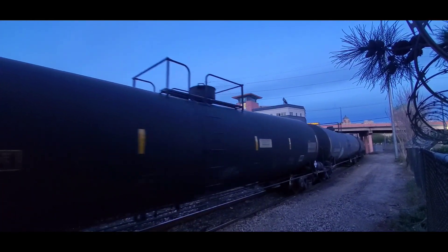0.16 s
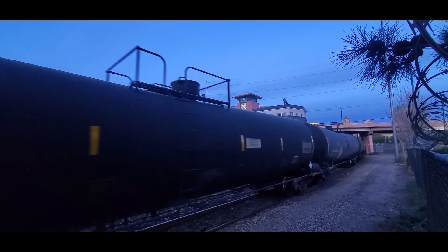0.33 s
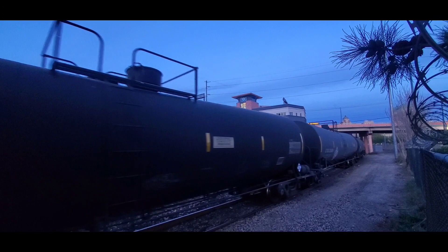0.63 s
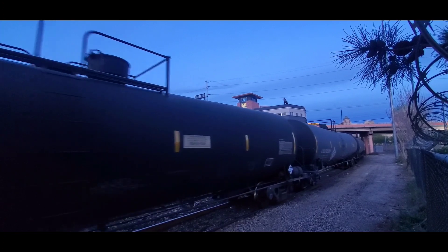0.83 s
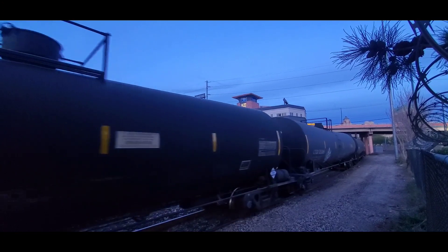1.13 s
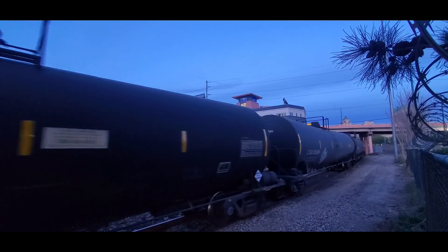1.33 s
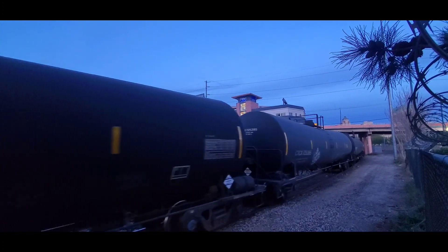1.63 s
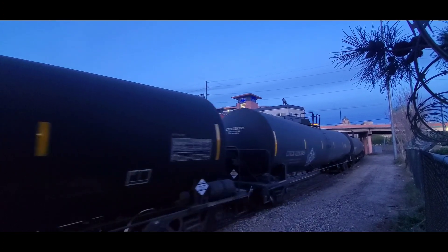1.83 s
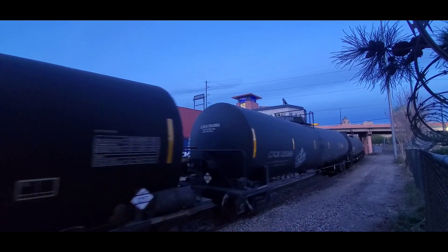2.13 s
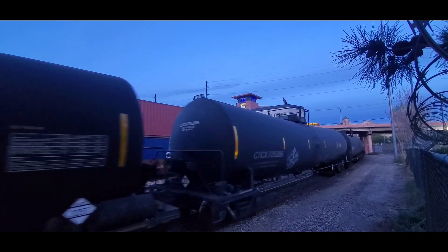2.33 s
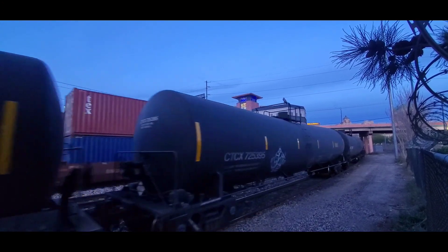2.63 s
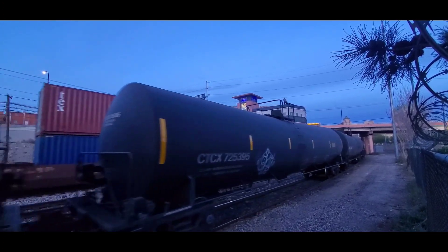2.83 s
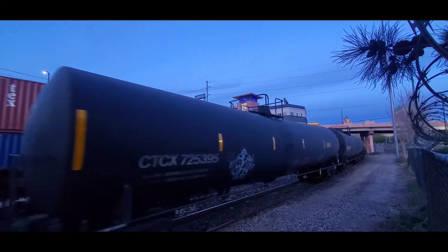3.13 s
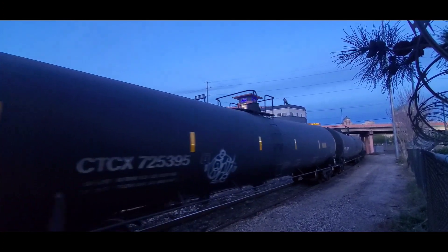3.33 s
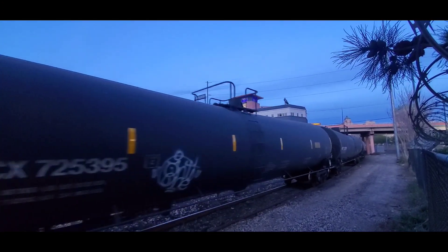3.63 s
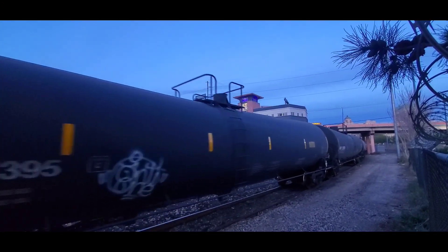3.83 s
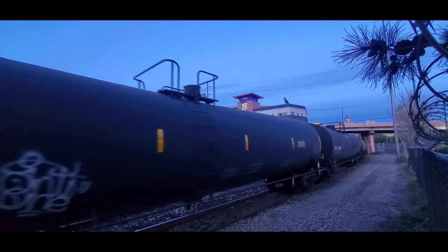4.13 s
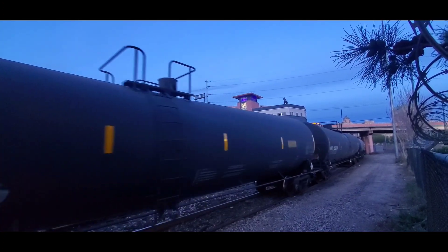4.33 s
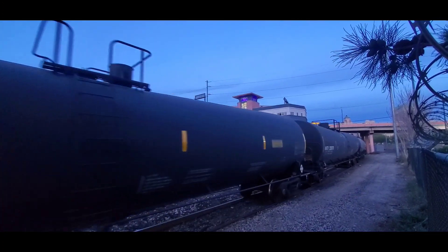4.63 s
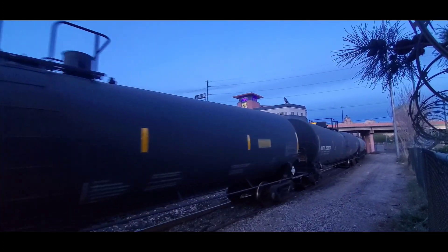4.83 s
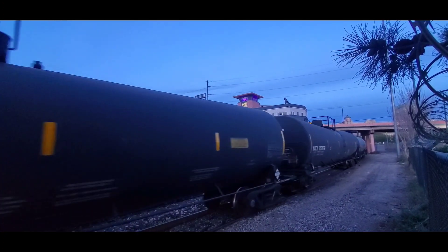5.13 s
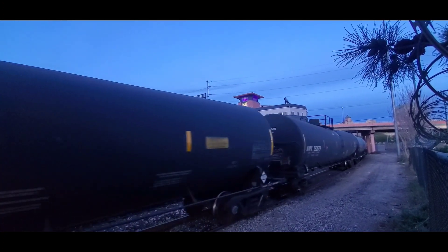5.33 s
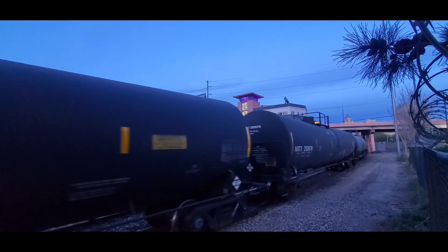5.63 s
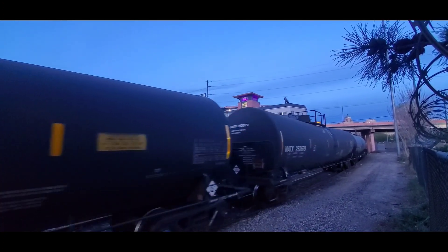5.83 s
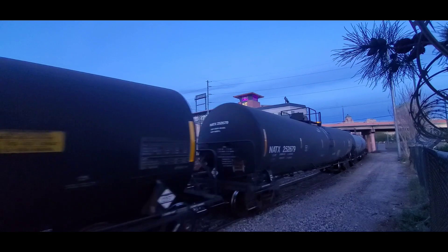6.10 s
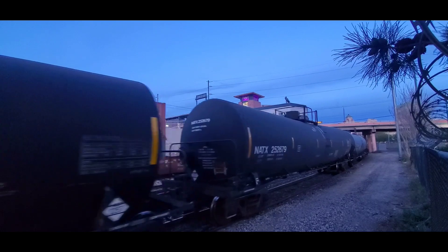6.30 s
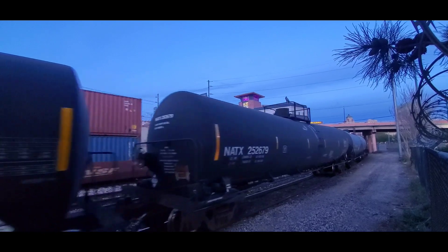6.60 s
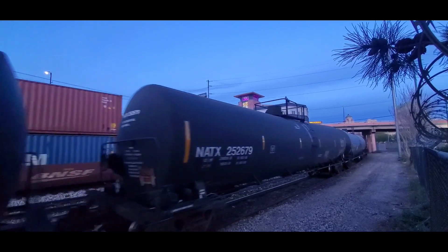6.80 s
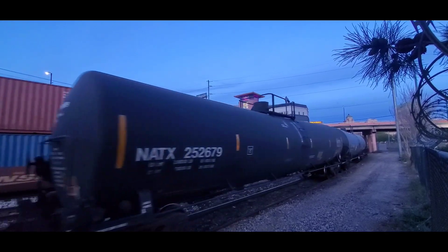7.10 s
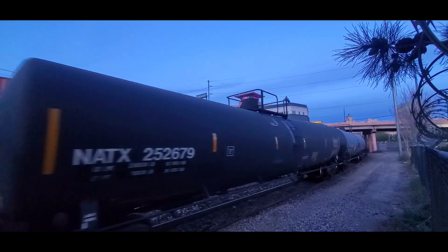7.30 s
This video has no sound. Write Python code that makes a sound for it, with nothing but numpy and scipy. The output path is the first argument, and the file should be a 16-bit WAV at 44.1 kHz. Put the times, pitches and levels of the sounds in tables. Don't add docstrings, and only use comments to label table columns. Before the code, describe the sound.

Heavy tank cars pass beside the track at walking pace: deep rumble, scraping flanges, thin ringing wheels, piercing squeals and dull thumps.

```python
import sys
import numpy as np
from scipy import signal
from scipy.io import wavfile
from scipy.ndimage import uniform_filter1d

SR = 44100
rng = np.random.default_rng(int(sys.argv[2]) if len(sys.argv) > 2 else 0)


def bounce(signal):
    frames = np.transpose(np.atleast_2d(signal))
    limited = np.clip(frames, -1, 1)
    pcm = np.round(limited * 32767).astype(np.int16)
    wavfile.write(sys.argv[1], SR, pcm)


def field_ratio(decibels):
    return 10 ** (np.asarray(decibels, dtype=float) / 20)


N = 328841

SPEED_M_S, DISTANCE_M, SOUND_M_S = 4.5, 6.5, 343


def evened(x):
    return x / np.sqrt(np.mean(x ** 2) + 1e-20)


def read(points, hz):
    f, value = np.transpose(points)
    return np.interp(np.log(hz + 1), np.log(f + 1), value)


def spectrum_grid(size):
    hop = size // 4
    hz = np.fft.rfftfreq(size, 1 / SR)[:, None]
    return hz, np.arange(N // hop + 5) * hop / SR


def patches(size, bins, frames):
    hz, t = spectrum_grid(size)
    field = rng.standard_normal((len(t), len(hz))).T
    across_pitch = uniform_filter1d(field, bins, 0)
    return evened(uniform_filter1d(across_pitch, frames, 1))


def flicker(per_s):
    knots = rng.standard_normal(1000)
    return evened(np.interp(np.arange(N) / SR * per_s, np.arange(1000), knots))


def heard(power, size):
    # pitch_hz, likeness (0-1)
    likeness = [(60, 1.0), (200, .98), (500, .9), (800, .72), (1600, .55), (2500, .3), (3500, .25),
                (6000, .1), (12000, .05)]
    # pitch_hz, left_minus_right_db
    balance = [(60, -1), (92, 0.5), (140, -2.5), (210, 0.5), (330, 1.0), (500, 1.5), (770, 1.0),
               (1170, 1.5), (1790, 0.5), (2740, -2), (4190, 1), (6410, 2), (9810, -2.5), (15000, 9)]
    # pitch_hz, lead_s
    left_lead = [(300, 0.00029), (1200, 0.00033), (2500, 0.000427)]
    hz, t = spectrum_grid(size)
    a, b, c, d = rng.standard_normal((len(t), len(hz), 4)).T
    same = np.clip(read(likeness, hz), 0, 1)
    left = a + 1j * b
    late = left * np.exp(-2j * np.pi * hz * read(left_lead, hz))
    right = same * late + np.sqrt(1 - same ** 2) * (c + 1j * d)
    tilt = field_ratio(read(balance, hz) / 2)
    z = np.array([left * tilt, right / tilt]) * np.sqrt(power)
    return signal.istft(z, nperseg=size, noverlap=size * 3 // 4)[1][:, :N]


def peak(hz, centre_hz, width_hz):
    return 1 / (1 + (2 * (hz - centre_hz) / width_hz) ** 2)


def layer(colour, level_db, size, patchy_db, streak_db):
    # pitch_hz, width_hz, level_db (over the noise)
    wheel_modes = [(367, 18, 2), (986, 30, 1.5), (1827, 45, 2), (2190, 20, -15.5), (2857, 50, 0.5),
                   (3320, 120, 0), (3470, 25, -1), (3980, 110, 2), (4513, 82, 4.5), (5120, 80, 1),
                   (5560, 100, 3.5), (5760, 120, 4), (6515, 130, 4.5), (7200, 160, 1.5), (7420, 90, 6.5),
                   (7900, 90, 3), (8400, 100, 8), (9350, 150, 2.5), (11950, 150, 5), (12580, 70, 6),
                   (12200, 67, 14), (13500, 70, 7), (14200, 100, -1), (14500, 340, 4)]
    hz, t = spectrum_grid(size)
    inside = (hz > colour[0][0]) & (hz < colour[-1][0])
    modes = 1 + sum(field_ratio(2 * mode_db) * peak(hz, f, w) for f, w, mode_db in wheel_modes)
    chance_db = patchy_db * patches(size, bins=24, frames=8)
    chance_db = chance_db + streak_db * patches(size, bins=2, frames=30)
    sound = heard(inside * modes * field_ratio(2 * (read(colour, hz) + chance_db)), size)
    return field_ratio(level_db) * sound / np.sqrt(np.mean(sound.mean(0) ** 2))


def train_level(db, weight, pressure):
    # time_s, weight_db (shaking the ground), pressure_db (flange on the rail)
    train = [(0, -31.5, -39), (.5, -31.5, -36), (.85, -27.5, -32.5), (1.1, -27, -30.5), (1.35, -23.5, -28),
             (1.7, -29, -25.5), (2.15, -28.5, -29), (2.65, -30.5, -28), (3.3, -34, -31), (3.7, -33, -32.5),
             (4.2, -32.5, -34), (4.7, -32.5, -36.5), (5.3, -33, -23), (5.85, -33, -26), (6.25, -36.5, -25),
             (6.65, -40, -29.5), (7.1, -34.5, -25.5), (7.46, -37, -33.5)]
    s, weight_db, pressure_db = np.transpose(train)
    both_db = weight * (weight_db + 32) + pressure * (pressure_db + 30)
    return db + np.interp(np.arange(N) / SR, s, both_db)


def doppler(t, passes_s):
    along_m = SPEED_M_S * (t - passes_s)
    return 1 - SPEED_M_S / SOUND_M_S * along_m / np.hypot(along_m, DISTANCE_M)


def settled(x, softness=0.43):
    slow = np.sqrt(abs(uniform_filter1d(x ** 2, size=12000)) + 1e-12)
    return slow * np.tanh(softness * x / slow) / softness


def ground_rumble():
    # pitch_hz, level_db (per Hz)
    colour = [(12, -50), (20, -30), (55, -3.5), (76, 5), (99, 0), (150, -12), (260, -20.5), (340, -37),
              (570, -120)]
    level_db = train_level(db=-31.0, weight=1, pressure=0)
    return settled(layer(colour, level_db, size=4096, patchy_db=1.2, streak_db=1.2))


def rolling_noise():
    # pitch_hz, level_db (per Hz)
    colour = [(65, -48), (110, -6.5), (155, -13), (263, -13), (367, -13), (423, -14.5), (650, -16.5),
              (897, -21), (1460, -20), (1900, -26.5), (2470, -59), (4180, -120)]
    level_db = train_level(db=-41.5, weight=0.8, pressure=0.31)
    return layer(colour, level_db, size=2048, patchy_db=1.0, streak_db=2.46)


def flange_rubbing():
    # pitch_hz, level_db (per Hz)
    colour = [(760, -22), (1450, -14), (1650, -7.5), (2750, -0.5), (3960, -1), (4220, -4), (4540, -2),
              (5010, -4), (6360, -1.5), (7910, -8), (9410, -9), (10300, -5), (11500, -2.5), (15000, -37),
              (22000, -120)]
    level_db = train_level(db=-30, weight=0, pressure=0.98)
    return layer(colour, level_db, size=2048, patchy_db=1.25, streak_db=3.5)


def shoe_drags(edge_s=.15):
    # start_s, end_s, level_db
    contacts = [
        (3.253, 4.113, 4.5),
        (7.244, 7.6, 4.5),
    ]
    t = np.arange(N) / SR
    extra_db = 0
    for start, end, db in contacts:
        inside_s = np.minimum(t - start, end - t)
        extra_db = extra_db + db * np.clip(inside_s / edge_s + .5, 0, 1)
    return extra_db


def steel_hiss():
    # pitch_hz, level_db (per Hz)
    colour = [(5590, -28), (9500, -8), (10500, -17.5), (11600, -3), (14000, -4.5), (14600, 0), (15200, 0),
              (15600, 0)]
    level_db = train_level(db=-29, weight=0.035, pressure=0.8) + shoe_drags()
    return layer(colour, level_db, size=2048, patchy_db=1.0, streak_db=2.0)


def wheel_rings(width_hz=20, throb_db=2.5, db=-4, size=4096, reach_bins=60):
    # middle_s, length_s, pitch_hz, level_db
    first_trucks = [(.26, 0.98, 12970, -34), (.72, 1.2, 7960, -35), (.93, 1.6, 6590, -54),
                    (.95, 2.63, 12620, -36), (1.18, 2.3, 14860, -24), (1.46, 0.59, 1790, -39),
                    (1.58, .68, 15040, -37), (2.69, 2.9, 6520, -32), (2.9, 1.79, 14180, -26),
                    (2.93, 2.5, 4520, -37), (2.93, 4.1, 8440, -32), (3.4, 1.3, 15000, -26),
                    (3.39, 1.3, 13750, -32), (3.39, 5.6, 7390, -43), (3.55, 1.5, 12740, -34),
                    (3.62, .68, 15440, -36), (3.95, 1.4, 5190, -40), (3.97, 2.5, 9670, -36),
                    (3.5, 1.3, 13150, -31), (4.27, 3.3, 14850, -32), (2.17, .4, 368, -35.5),
                    (2.6, 0.58, 367, -36), (5.7, .9, 367, -43.5)]
    # middle_s, length_s, pitch_hz, level_db
    second_trucks = [(4.71, 1.79, 12300, -46), (4.9, 1.79, 15060, -26.5), (5.52, 1.27, 1830, -34.5),
                     (5.69, 0.57, 14310, -34.9), (5.8, 2.63, 8400, -32.5), (5.87, 1.8, 11050, -49),
                     (6.13, 2.63, 11680, -33), (6.22, 0.69, 4400, -28), (6.8, .9, 4500, -31.5),
                     (6.34, .36, 13850, -35), (6.8, .9, 11000, -39), (6.6, .4, 12190, -30),
                     (6.36, 1.4, 6470, -36), (6.6, 0.96, 12000, -38), (6.57, .68, 14500, -36),
                     (6.75, 1.7, 1590, -38), (6.59, 1, 6040, -50), (6.95, 0.88, 3965, -30),
                     (6.66, .36, 15090, -21), (6.9, 1.3, 7400, -46), (6.73, 1.79, 3330, -49),
                     (6.76, 2.4, 2190, -35), (6.83, 2.5, 14780, -26), (6.85, .4, 2720, -27.5),
                     (7.06, 2.2, 8370, -38), (7.1, 0.61, 3500, -49), (7.2, .68, 13290, -37),
                     (7.3, 0.63, 13600, -33)]
    hz, t = spectrum_grid(size)
    power = np.zeros((len(hz), len(t)))
    for rows, passes_s in ((first_trucks, 4), (second_trucks, 7.03)):
        for middle, length, f, ring_db in rows:
            swell = np.cos(np.pi * np.clip((t - middle) / length, -.5, .5)) ** 2
            throb = evened(uniform_filter1d(rng.standard_normal(len(t)), size=2))
            sinking_hz = f * doppler(t, passes_s) / doppler(middle, passes_s)
            centre_bin = round(f * size / SR)
            near = slice(max(centre_bin - reach_bins, 0), centre_bin + reach_bins)
            shape = peak(hz[near], sinking_hz, width_hz) ** 2
            power[near] += field_ratio(2 * (ring_db + throb_db * throb)) * swell * shape
    return field_ratio(db) * heard(power * SR / size / width_hz, size)


def squeal(passes_s, hz, grips, waver_hz=15, throb=.4, grip_db=1.5, db=3):
    rise_db_s, fall_db_s = 49, 34
    t = np.arange(N) / SR
    grip_levels = []
    for start, end, top_db in grips:
        slope_db = np.minimum(rise_db_s * (t - start), fall_db_s * (end - t))
        grip_levels.append(top_db + np.minimum(0, slope_db))
    held_db = np.max(grip_levels, axis=0)
    sides = []
    for side_db in (1.5, -1.5):
        turns = np.cumsum(hz * doppler(t, passes_s) + waver_hz * flicker(per_s=80)) / SR
        beat = 1 + throb * flicker(per_s=70)
        sides.append(field_ratio(side_db) * beat * np.sin(2 * np.pi * turns))
    return field_ratio(held_db + db + grip_db * flicker(per_s=19)) * np.array(sides)


def wheel_squeals():
    # passes_s, pitch_hz (at rest)
    wheels = [
        (2.4, 11925),
        (4.5, 11800),
    ]
    # start_s, end_s (at full level), level_db
    near_grips = [
        (.2, .8, -42),
        (1.05, 1.6, -24.5),
        (1.9, 2.804, -22.5),
    ]
    # start_s, end_s (at full level), level_db
    far_grips = [
        (.6, .9, -38),
        (1.2, 1.55, -23),
        (3.0, 3.3, -35),
    ]
    return sum(squeal(*wheel, grips) for wheel, grips in zip(wheels, (near_grips, far_grips)))


def joint_knocks(rise_s=.01, fall_db_s=130):
    # time_s, level_db
    joints = [(.64, -43), (1.2, -40), (1.33, -40), (2.02, -42), (2.49, -35), (2.62, -38), (2.75, -34),
              (3.17, -45), (3.4, -46), (3.8, -38), (3.94, -36), (5.25, -43), (5.85, -45), (6.33, -47),
              (7.05, -39), (7.2, -44)]
    # pitch_hz, level_db (per Hz)
    colour = [(90, -30), (150, 0), (250, -0.5), (340, 0), (430, -6), (700, -30)]
    t = np.arange(N) / SR
    falls = [db - np.maximum(fall_db_s * (t - s), 9 * (s - t) / rise_s) for s, db in joints]
    return layer(colour, np.max(falls, axis=0), size=1024, patchy_db=1.0, streak_db=3.5)


def rail_hum(swell_s=0.47):
    # time_s, level_db
    approaches = [
        (1.4, -52),
        (5.4, -41.5),
    ]
    # pitch_hz, level_db (per Hz)
    colour = [(350, -35), (550, 1.5), (750, -2), (1150, -8.5), (1500, 1), (2100, -45)]
    t = np.arange(N) / SR
    swells = [db - 9 * ((t - s) / swell_s) ** 2 for s, db in approaches]
    return layer(colour, np.max(swells, axis=0), size=2048, patchy_db=1.5, streak_db=5.5)


def scene():
    low = ground_rumble() + rolling_noise()
    rubbing = flange_rubbing()
    bright = steel_hiss() + wheel_rings()
    squeals = wheel_squeals()
    low += joint_knocks()
    low += rail_hum()
    slips = flicker(per_s=25)
    return low + rubbing * field_ratio(0.78 * slips) + bright * field_ratio(0.67 * slips) + squeals


def band_limit(x):
    return signal.sosfilt(signal.butter(12, 16670, fs=SR, output="sos"), x)


def record(dry):
    edge = signal.firwin(1023, 15560, window=("kaiser", 9), fs=SR)
    mix = signal.oaconvolve(dry, edge[None], "same")
    return band_limit(mix)


dry = scene()
out = record(dry)
bounce(out)
```